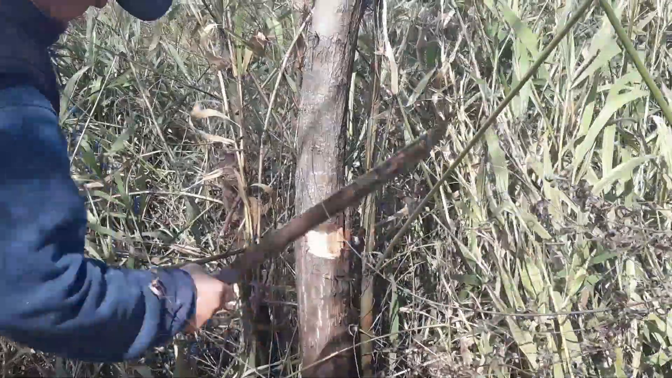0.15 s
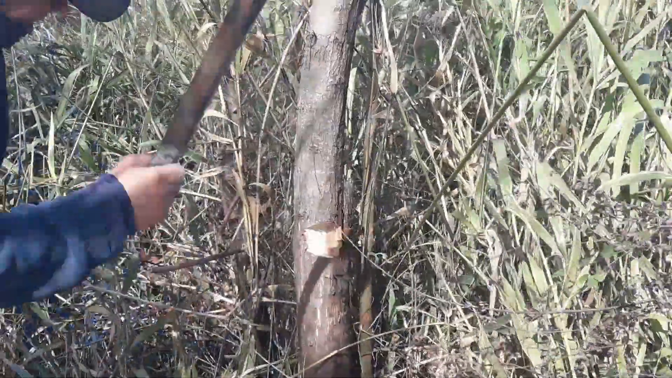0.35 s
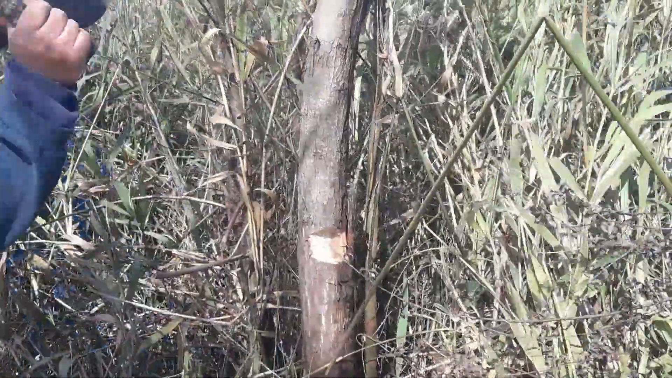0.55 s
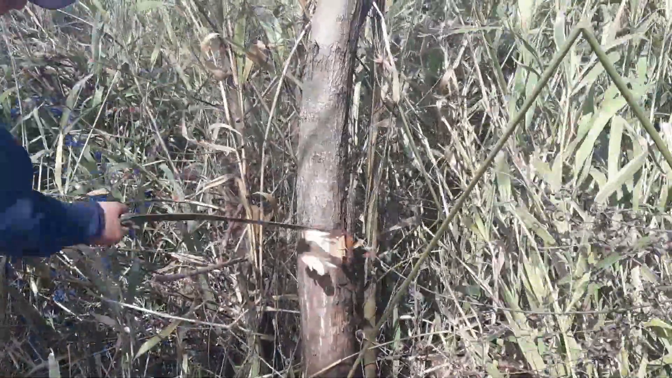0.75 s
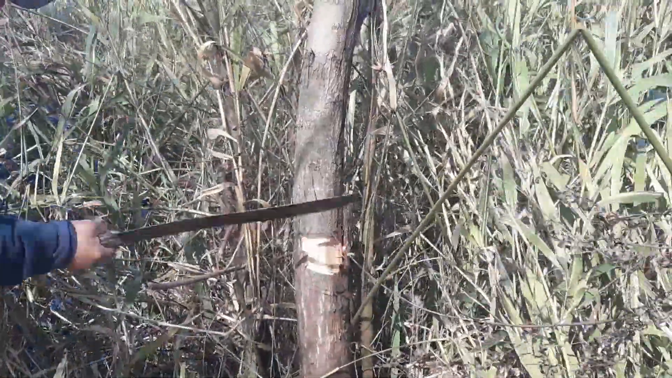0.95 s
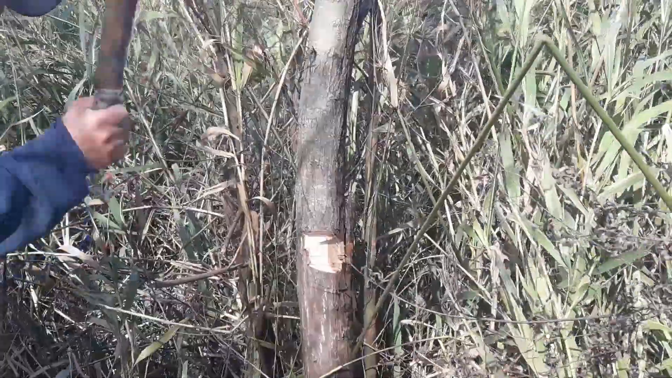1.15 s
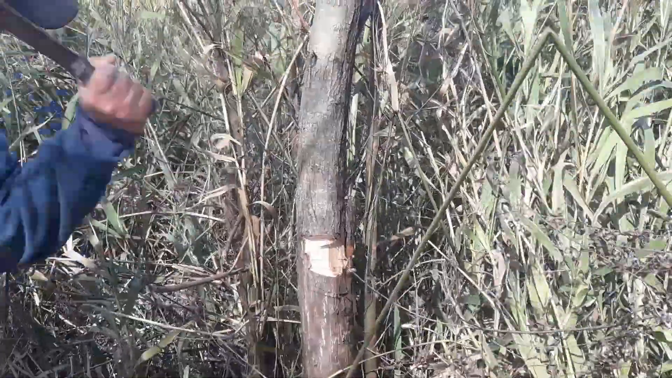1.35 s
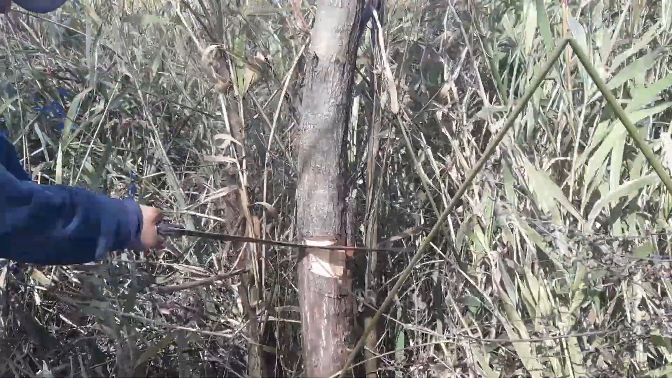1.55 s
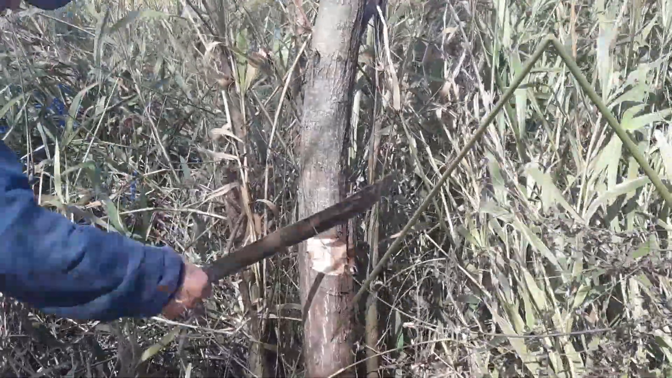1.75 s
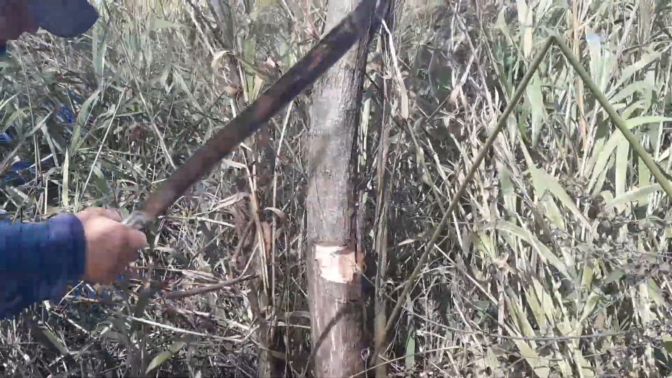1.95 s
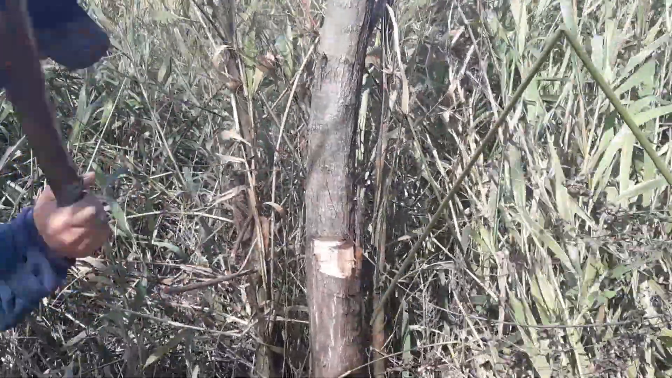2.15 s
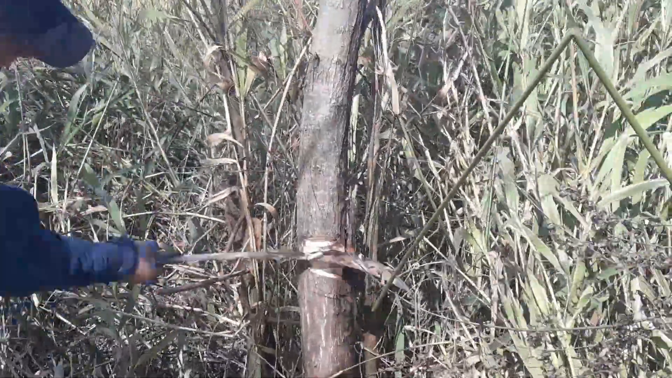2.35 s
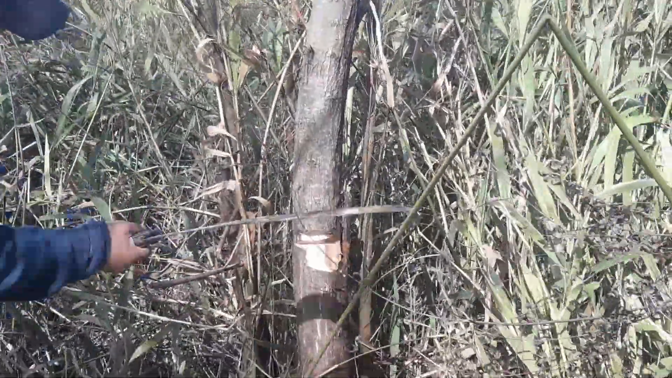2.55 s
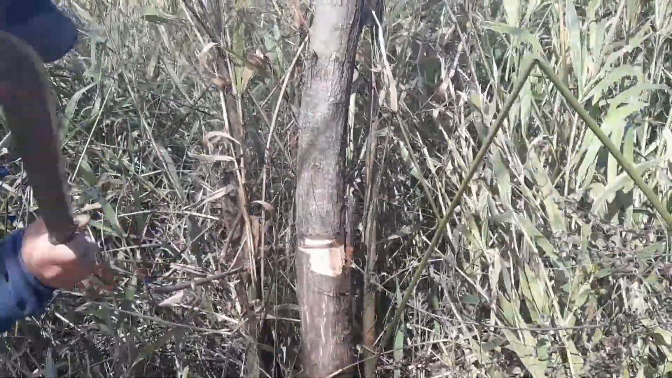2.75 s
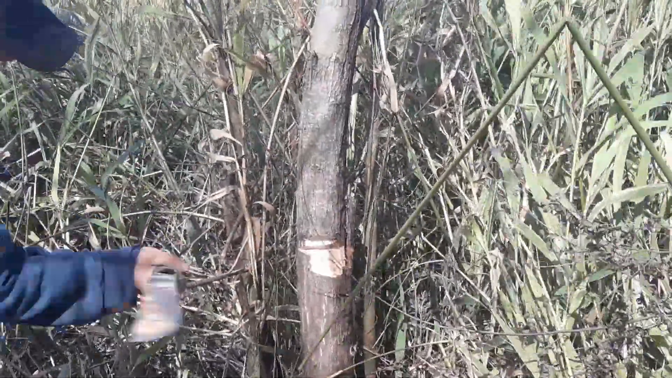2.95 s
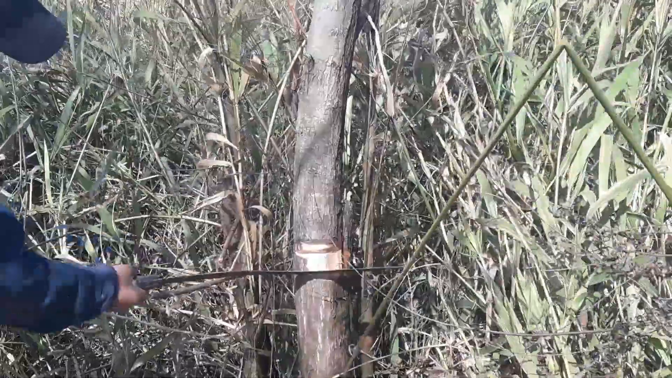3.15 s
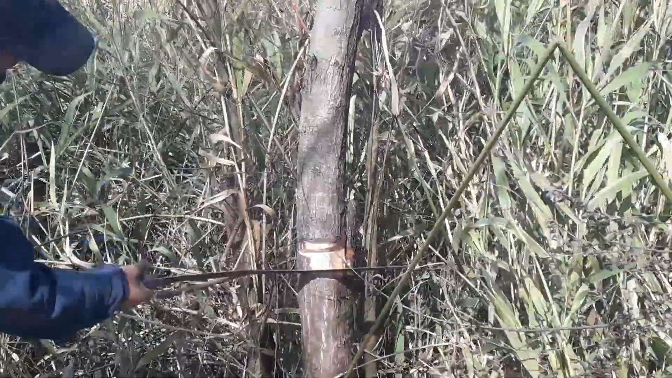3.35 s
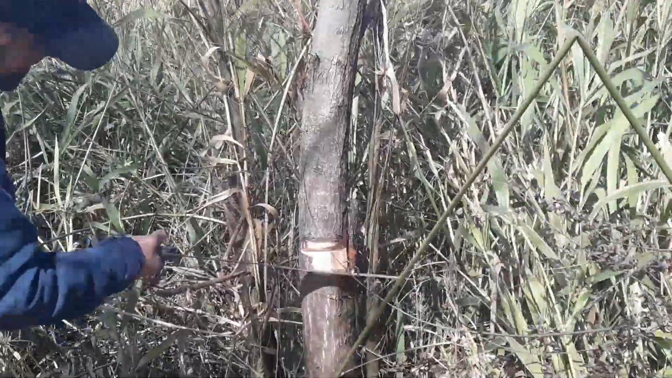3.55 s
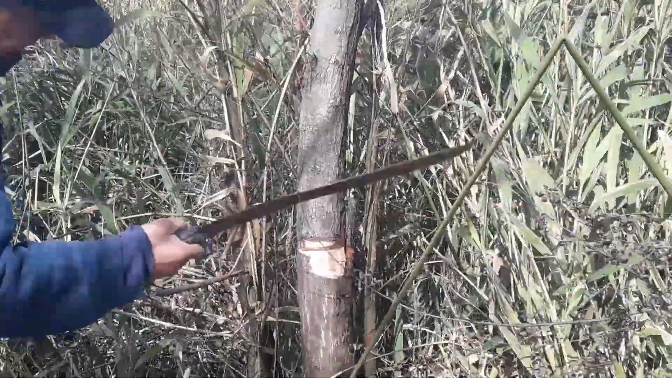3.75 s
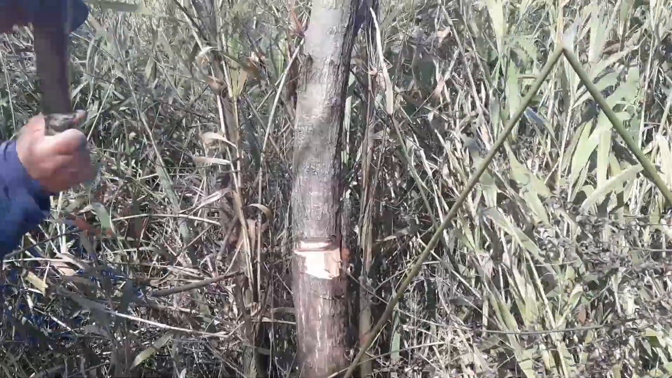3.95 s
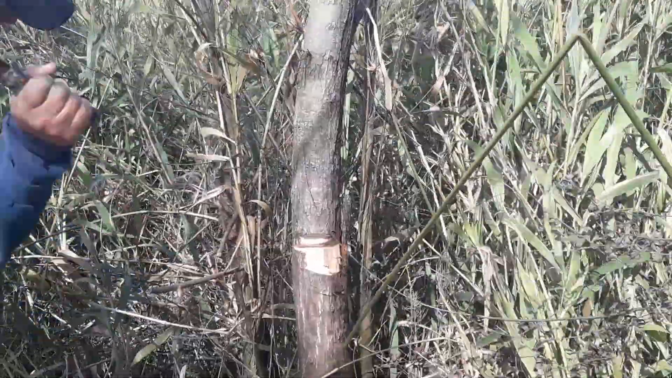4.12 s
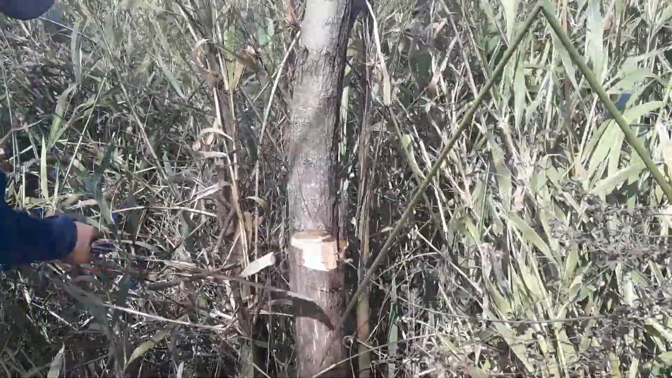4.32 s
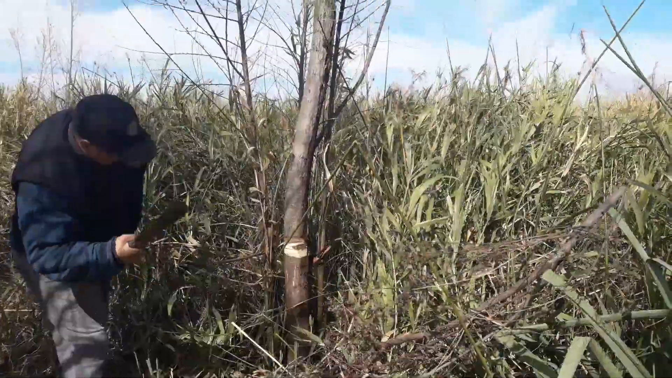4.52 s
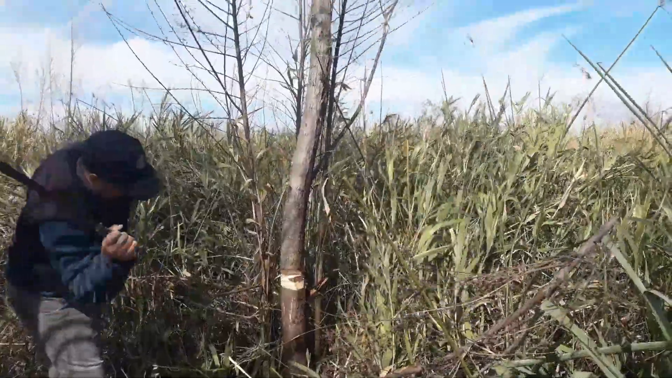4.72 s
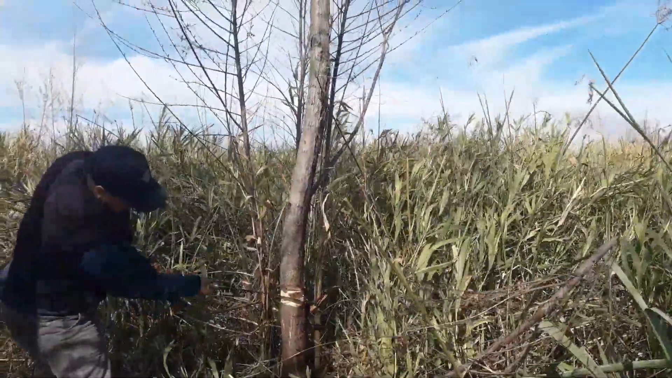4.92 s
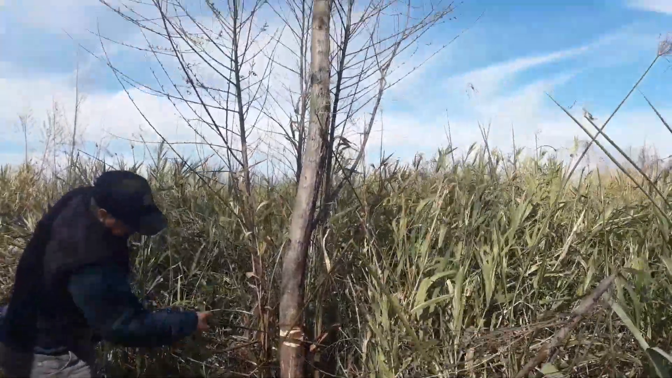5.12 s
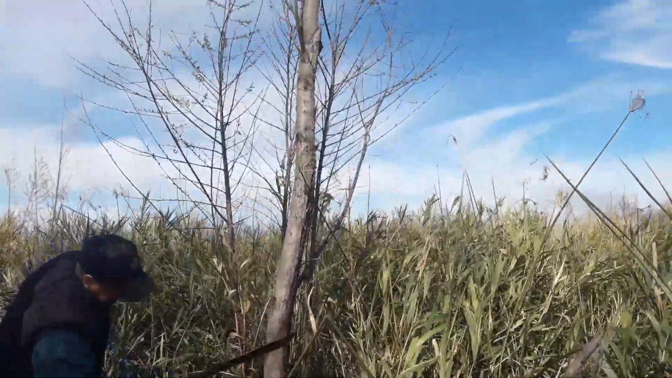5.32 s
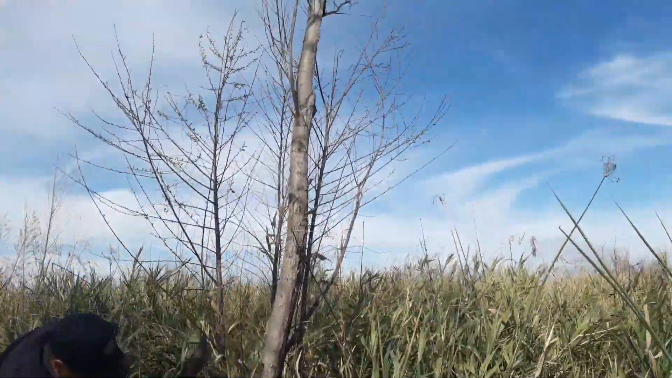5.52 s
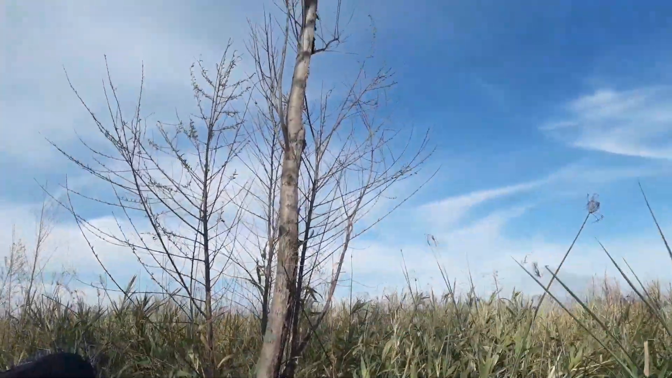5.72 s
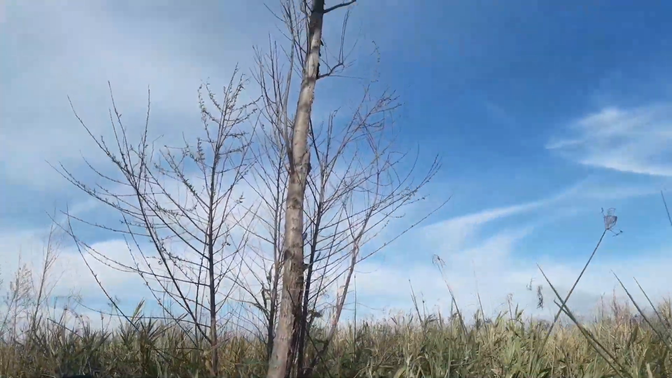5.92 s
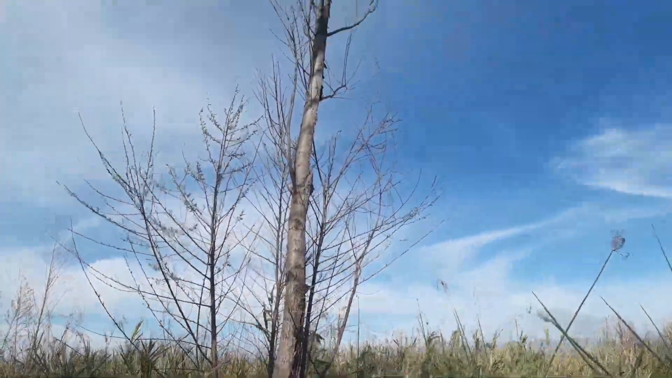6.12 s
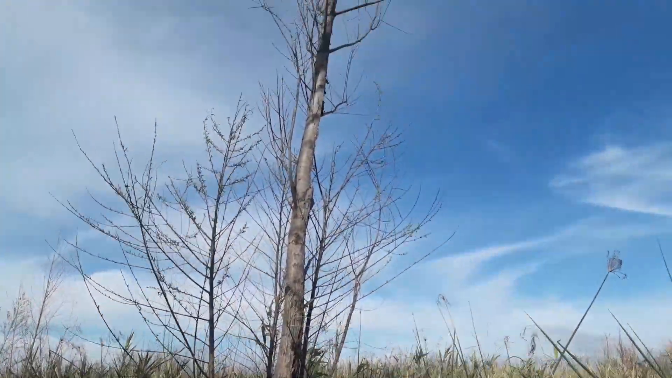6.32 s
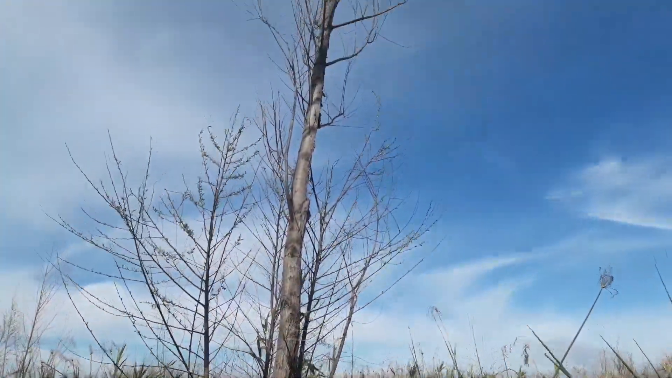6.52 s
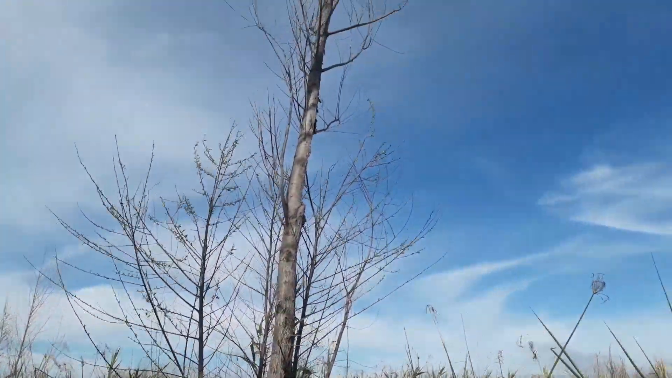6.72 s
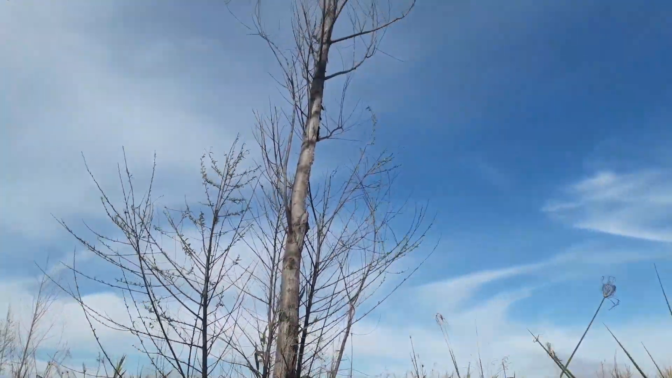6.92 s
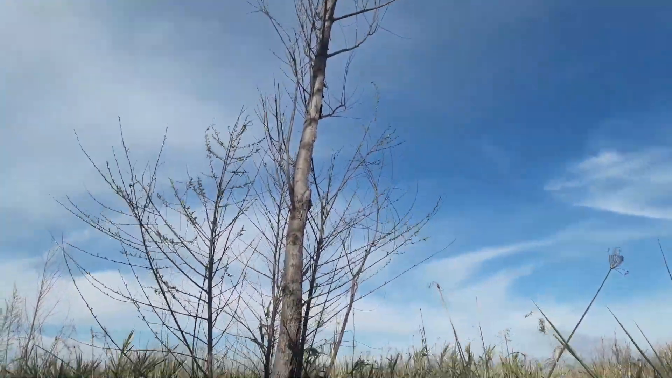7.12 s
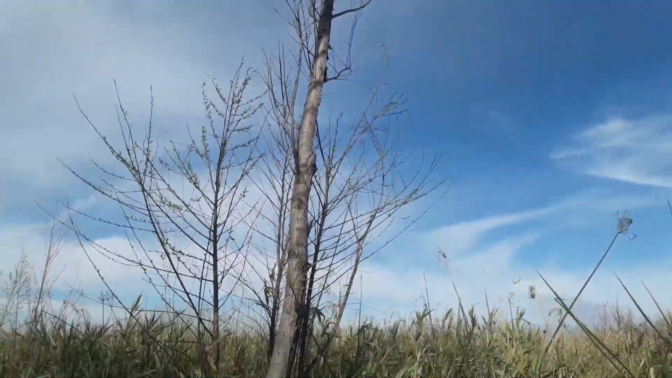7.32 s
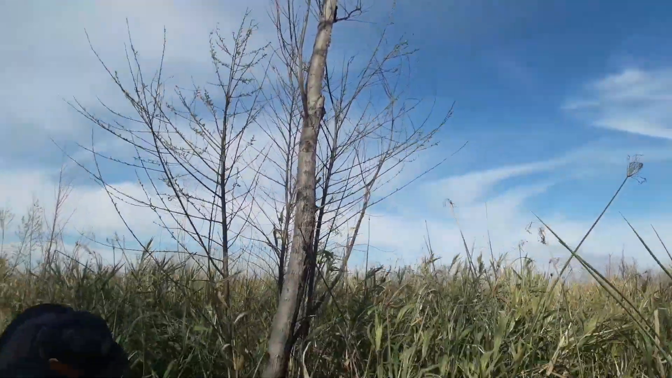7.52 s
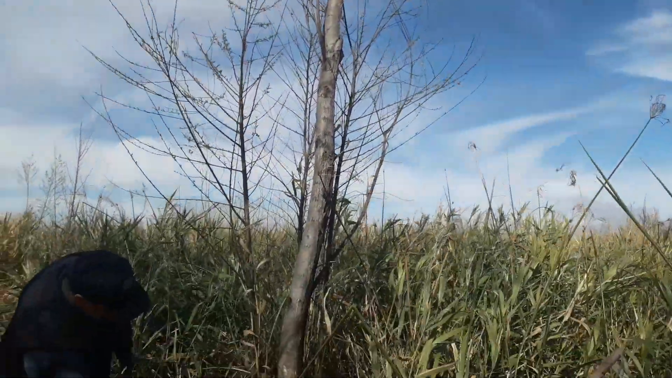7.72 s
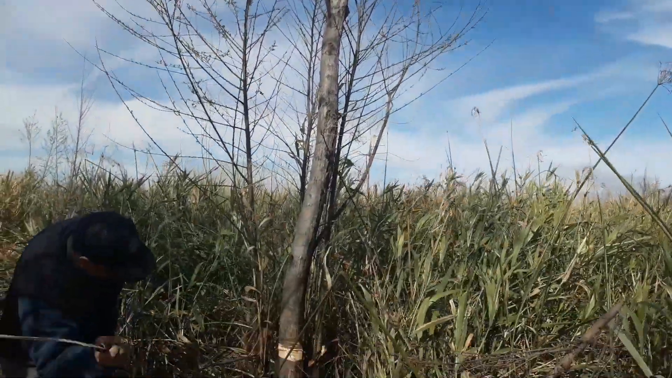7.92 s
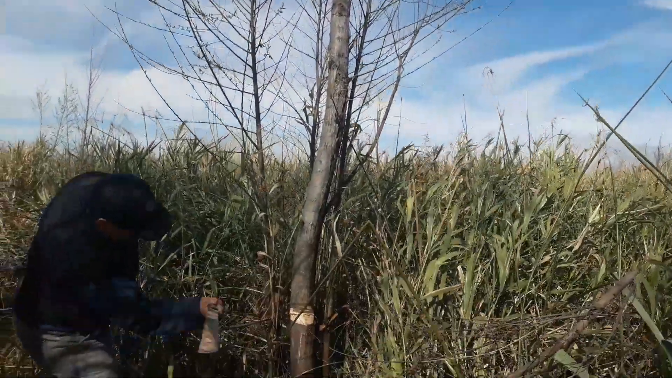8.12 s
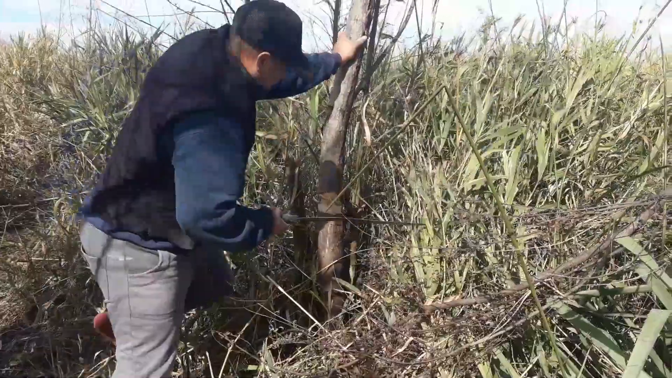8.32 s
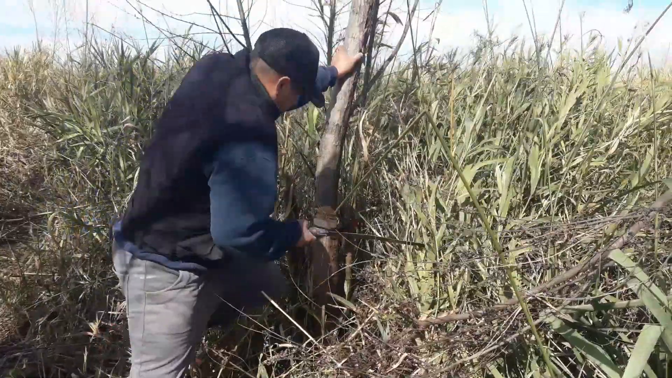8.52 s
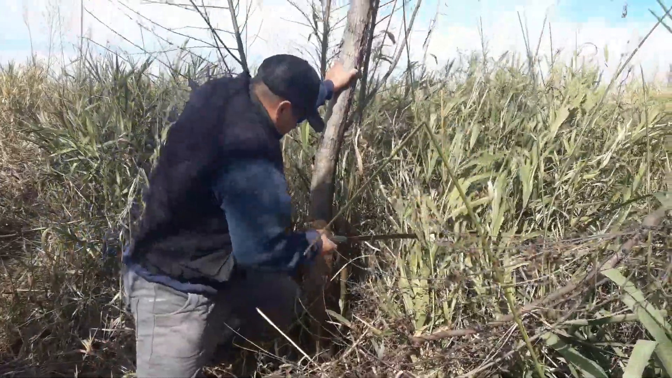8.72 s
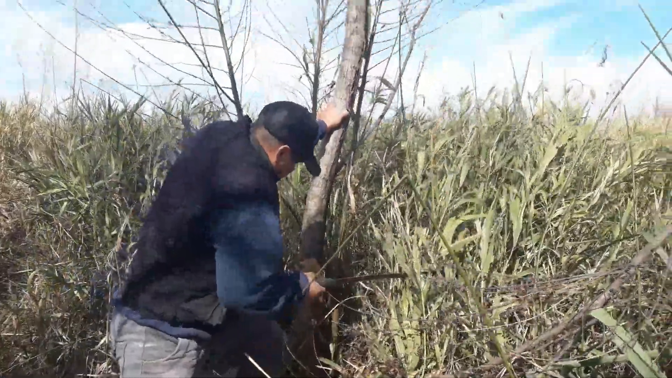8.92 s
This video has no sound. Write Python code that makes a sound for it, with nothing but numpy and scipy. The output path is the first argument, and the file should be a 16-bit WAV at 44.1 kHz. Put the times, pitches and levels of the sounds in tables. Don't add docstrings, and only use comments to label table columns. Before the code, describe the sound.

A small microphone sits close to a thin green trunk in a breezy reed bed. A faint snap and steel tick open over soft leaf hiss, followed by dry stem clicks. The first bright chop lands at 0.8 s: splitting crack, short wooden knock, brief blade ring and a scatter off the reeds. More stems snap around 1.1 s; a duller, solid blow comes at 1.5, snaps near 1.8, a strong crack at 2.4 and a bright one at 3.1. The loudest crack falls at 4.3 with small metallic pings after it, then a heavy dull blow at 5.0. From 5.65 wind slams the microphone with low thumps and puffs, rumbling unevenly until about 7.4. Through it come a faint chop at 6.2 and a very bright one at 6.9. Another bright, light-knocking chop follows at 7.6, a choked last blow at 8.3, and a sharp twig snap at 8.65 over rustling reeds until 9.

```python
import sys
import numpy as np
from scipy import signal
from scipy.io import wavfile
from scipy.ndimage import uniform_filter1d, minimum_filter1d

SR = 44100
rng = np.random.default_rng(int(sys.argv[2]) if len(sys.argv) > 2 else 0)


def store_wav(level_fs):
    pcm = np.round(np.clip(np.atleast_2d(level_fs), -1, 1) * 32767)
    wavfile.write(sys.argv[1], SR, pcm.T.astype(np.int16))


def ratio(d):
    e = np.asarray(d, float) / 20
    return 10 ** e


N = 399973
EVENT = 2 * SR // 5


def rms_one(x):
    return x / np.sqrt(np.mean(x ** 2) + 1e-20)


def butter(x, order, hz, kind):
    return signal.sosfilt(signal.butter(order, hz, kind, fs=SR, output="sos"), x)


def in_time(rows):
    s, *columns = np.transpose(rows)
    return [np.interp(np.arange(N) / SR, s, column) for column in columns]


def drift(rate):
    r = np.exp(-80 * np.pi * rate / SR)
    white = rng.standard_normal(N // 40 + 2002)
    slow = signal.lfilter([1], [1, -2 * r, r * r], white)[2000:]
    return np.interp(np.arange(N) / 40, np.arange(len(slow)), rms_one(slow))


def ring(clicks, hz, t60):
    r, w = ratio(-60 / (t60 * SR)), 2 * np.pi * hz / SR
    return signal.lfilter([0, np.sin(w)], [1, -2 * r * np.cos(w), r * r], clicks + 1e-18)


def resonance(x, hz, width_hz):
    r = np.exp(-np.pi * width_hz / SR)
    poles = [1, -2 * r * np.cos(2 * np.pi * hz / SR), r * r]
    return signal.lfilter((1 - r * r) / 2 * np.array([1, 0, -1]), poles, x)


# (frequency [Hz], width [Hz], level [dB])
HOUSING_MODES = [(3030, 790, -1), (5440, 350, 3.5)]


def housing(x):
    return rms_one(sum(ratio(level_db) * resonance(x, hz, width_hz) for hz, width_hz, level_db in HOUSING_MODES))


def bands(spectrum):
    hz, level_db = np.transpose(spectrum)
    edges = np.geomspace(hz[0], hz[-1], int(3 * np.log2(hz[-1] / hz[0])) + 2)
    white, out = rng.standard_normal((2, N)), []
    for k, (low, high) in enumerate(zip(edges, edges[1:])):
        mid = np.sqrt(low * high)
        band = butter(white[k % 2], 2, [low, high], "band")
        out.append((mid, band * ratio(np.interp(np.log(mid), np.log(hz), level_db))))
    total = np.sqrt(sum(np.mean(band ** 2) for mid, band in out))
    return [(mid, band / total) for mid, band in out]


def fall(level_db, t60, rise, delay=0.):
    t = np.maximum(np.arange(EVENT) / SR - delay, 0)
    return ratio(level_db - 60 * t / t60) * (1 - np.exp(-t / rise))


def add(out, s, piece):
    at = round(s * SR)
    out[at:at + len(piece)] += piece[:N - at]


def piece_of(noise, s):
    return noise.take(round(s * SR) + np.arange(EVENT), mode="wrap")


# (time [s], rustle level [dB], nearness of the moving leaves [dB])
REED_MOTION = [(0.0, -50.5, 2), (0.45, -49, 6.5), (0.73, -38.5, 6.5), (0.93, -41.5, 0), (1.08, -43.5, 11),
               (1.26, -48, -2), (1.64, -45, 0.5), (2.33, -40.5, -4), (2.8, -53, -1), (3.6, -50, -1),
               (4.24, -42.5, -1.5), (4.7, -45.5, -0.5), (5.35, -60, 0), (5.88, -42, 1), (6.62, -58, 1),
               (7.35, -60, 1.5), (7.75, -49.5, -2), (9.07, -41.5, 2.5)]


def stirring():
    rustle_db, near_db = in_time(REED_MOTION)
    t = np.arange(N) / SR
    before_s, after_s = 0.1, 0.19
    stirred = sum(np.exp(np.minimum((t - s) / before_s, (s - t) / after_s)) for s, *_ in CHOPS)
    rustle_db = rustle_db + 5.5 * stirred
    swing_db = rustle_db - np.mean(rustle_db)
    swish_db = -53 + 0.63 * swing_db + near_db
    sizzle_db = -68 + 0.47 * swing_db + 1.36 * near_db
    return rustle_db, swish_db, sizzle_db


# (frequency [Hz], level per Hz [dB])
RUSTLE_SPECTRUM = [(180, -5), (300, 0), (413, -3), (465, -1), (539, -8.5), (591, -5), (792, -3),
                   (1150, -3.5), (1400, -6.5), (1520, -4.5), (3200, -4.5), (5370, -11), (7200, -17.5),
                   (9360, -59), (15800, -120)]
# (frequency [Hz], level per Hz [dB])
SIZZLE_SPECTRUM = [(4410, -34), (7500, -19), (8160, -33), (9220, 10), (14900, 13), (15600, -3), (16200, -9)]


def reeds(rustle_db, swish_db, sizzle_db):
    shared, out = drift(25), 0
    rustle_mean_db, swish_mean_db = np.mean(rustle_db), np.mean(swish_db)
    for hz, band in bands(RUSTLE_SPECTRUM):
        follow = np.clip(0.43 + 0.063 * np.log2(hz / 300), 0, 1)
        bright = np.clip(7.5 * np.log2(hz / 2800), 0, 1)
        swing_db = (1 - bright) * follow * (rustle_db - rustle_mean_db) + bright * (swish_db - swish_mean_db)
        out = out + band * ratio(rustle_mean_db + 4.0 + swing_db + 0.83 * shared + 1.0 * drift(14))
    for hz, band in bands(SIZZLE_SPECTRUM):
        out = out + band * ratio(sizzle_db + 2.0 + 0.7 * shared + 0.65 * drift(8))
    return out


def brushing(swish_db):
    landed = rng.random(N) < 2500 / SR
    strength = ratio(3.7 * np.minimum(rng.exponential(1, N), 4.0))
    grains = landed * strength * rng.choice([-1, 1], N)
    return housing(grains + 1e-18) * ratio(-43.5 + 1.48 * (swish_db + 43.5) + 2.8 * drift(30))


# (time [s], level [dB])
BREEZE_LEVEL = [(0.0, -48), (0.2, -56), (0.7, -46.5), (1.15, -49.5), (2.2, -46.5), (2.8, -51), (3.6, -50),
                (4.2, -40.5), (4.65, -53.5), (4.95, -41.5), (5.2, -61), (5.5, -54), (6.5, -36.5),
                (7.4, -43), (7.62, -57), (7.95, -49), (9.07, -49)]
# (time [s], peak level [dB], hold [s])
GUST_PEAKS = [(0.834, -37, 0.051), (2.354, -34, 0.046), (2.495, -39.5, 0.052), (5.564, -39.5, .012),
              (5.629, -28.5, 0.014), (5.688, -16.5, 0.03), (5.75, -19, 0.028), (5.791, -25.5, 0.043),
              (5.9, -32, 0.057), (5.95, -35, .07), (6.041, -19.5, 0.053), (6.117, -26, 0.078),
              (6.285, -31, 0.011), (6.368, -29.5, 0.055), (6.49, -33.5, .05), (6.544, -29.5, 0.062),
              (6.746, -26, .03), (6.789, -19.5, 0.12), (6.93, -25, 0.098), (7.035, -26, 0.12),
              (7.17, -27.5, .11), (7.325, -34, 0.051), (7.383, -33, 0.02), (7.927, -39, 0.029),
              (8.15, -39.5, 0.017), (3.65, -41.5, .04), (4.82, -44, .05), (6.594, -29, 0.021)]


def gusting():
    rise_db_per_s, fall_db_per_s = 550, 329
    t, (level_db,) = np.arange(N) / SR, in_time(BREEZE_LEVEL)
    for s, peak_db, hold in GUST_PEAKS:
        loss_db = np.maximum(rise_db_per_s * (s - t), fall_db_per_s * (t - s - hold))
        level_db = np.maximum(level_db, peak_db - np.maximum(loss_db, 0))
    return level_db


# (frequency [Hz], level per Hz [dB])
BUFFET_SPECTRUM = [(15, -61), (25, -18.5), (112, 1), (267, -1.5), (294, -3), (425, -3), (486, -7.5),
                   (601, -8.5), (1250, -24.5), (2500, -42), (3250, -72), (5500, -120)]


def wind():
    full_gust_db, dulling_per_octave = -13, 0.18
    level_db = gusting()
    lumps_db = 1.07 * drift(16.6) + 2.85 * drift(94)
    out = 0
    for hz, band in bands(BUFFET_SPECTRUM):
        swing = 1 + dulling_per_octave * max(np.log2(hz / 150), 0)
        below_db = swing * (level_db - full_gust_db + lumps_db)
        out = out + band * ratio(full_gust_db + 2.5 + below_db + 0.89 * drift(14.0))
    return out


PING_TIMES = (.027, .03, .028, .027, .028, .029, .82, .815, 2.48, 4.368, 4.345, 4.372, 4.492, 4.495, 4.418)
# (level [dB], frequency [Hz], decay time t60 [s])
PING_MODES = [(-37, 3880, 0.06), (-44, 5000, 0.059), (-36.5, 3360, 0.058), (-31, 2420, 0.031),
              (-34, 2030, 0.034), (-35, 2850, .03), (-58, 8700, .08), (-38.5, 3380, 0.16),
              (-51, 3880, 0.18), (-34, 3400, 0.098), (-52, 8740, .08), (-58, 8680, .15), (-59, 11250, 0.09),
              (-66, 12100, .08), (-62, 6950, .15)]


def pings():
    out, t = np.zeros(N), np.arange(EVENT) / SR
    for s, (level_db, hz, t60) in zip(PING_TIMES, PING_MODES):
        add(out, s, fall(level_db + 12.5, t60, 0.0052) * np.sin(2 * np.pi * hz * t))
    return out


# (frequency [Hz], level per Hz [dB])
CRACK_SPECTRUM = [(710, 1.5), (1200, -15.5), (1730, -12.5), (2640, 0.5), (2940, -3), (3280, -1.5),
                  (3820, -8), (5190, -7), (6890, -24), (7500, -52), (9750, -53), (16500, -120)]
# (frequency [Hz], level per Hz [dB])
EDGE_SPECTRUM = [(4410, 5.5), (7500, 10), (8130, -29), (8840, -5), (13100, -4.5), (15500, -15),
                 (16200, -15)]


def fracture_noises():
    return [sum(band for hz, band in bands(spectrum)) for spectrum in (CRACK_SPECTRUM, EDGE_SPECTRUM)]


# (time [s], peak level [dB], edge level [dB], decay time t60 [s])
STEM_SNAPS = [(0.028, -20.5, -61, 0.073), (0.473, -22.5, -44, 0.041), (0.5735, -28, -53, 0.034),
              (0.748, -20, -27, 0.023), (0.858, -19.5, -39, 0.043), (1.06, -26, -31, 0.064),
              (1.0956, -12.5, -31, 0.04), (1.1128, -21, -35, 0.084), (1.262, -27.5, -49, 0.04),
              (1.285, -29, -60, 0.035), (1.434, -27, -44, 0.033), (1.745, -24, -55, 0.022),
              (1.8035, -19, -40, 0.012), (1.8716, -13.5, -48, 0.012), (1.986, -28, -55, 0.025),
              (2.0726, -31, -50, 0.028), (3.491, -25, -36, 0.032), (3.6195, -26.5, -49, 0.041),
              (3.631, -29, -65, 0.048), (4.3594, -27, -51, 0.03), (4.411, -21, -55, 0.044),
              (.6408, -23, -55, .04), (1.0444, -27, -50, .03), (.505, -29, -55, .02), (.738, -25, -45, .02),
              (4.446, -28, -67, 0.03), (6.1886, -28, -37, 0.06), (6.305, -26, -38.5, 0.094),
              (3.5864, -38, -59, .03), (4.314, -36, -44, .07), (8.744, -18, -63, 0.081),
              (8.992, -29, -65, 0.027)]
# (time [s], peak level [dB], edge level [dB], decay time t60 [s])
TWIG_SNAPS = [(1.097, -17, -45, .03), (1.116, -22, -45, .03), (1.062, -24, -45, .03),
              (1.1672, -25, -56, .03), (1.8425, -18, -50, 0.084), (3.4191, -23.5, -59, 0.02),
              (5.2297, -36, -65, .03), (5.28, -40, -65, .03), (7.1302, -32, -39.5, 0.077),
              (8.656, -6, -46, 0.03), (8.689, -19, -48, 0.02), (5.75, -30, -39, .015)]


def snaps(crack, edge):
    stem_hz, twig_hz = 3260, 5240
    out = np.zeros(N)
    body = rms_one(butter(rng.standard_normal(N), 2, [500, 1500], "band"))
    events = [(*row, stem_hz) for row in STEM_SNAPS] + [(*row, twig_hz) for row in TWIG_SNAPS]
    for s, peak_db, edge_db, t60, hz in events:
        body_db = -12 + 1.28 * peak_db
        t60 = np.clip(t60, .005, .2)
        tuned = 0.56 * housing(rng.standard_normal(EVENT))
        tuned += 1.11 * rms_one(resonance(piece_of(crack, s), hz, 2200))
        snap = tuned * (fall(peak_db - 4, 0.0068, 0.00046) + fall(peak_db - 13.5, t60, 0.00054))
        snap += piece_of(edge, s) * fall(edge_db, t60, 0.00016)
        snap += piece_of(body, s) * fall(body_db - .5, t60, .001)
        add(out, s, snap)
    return out


# (frequency [Hz], level [dB], decay time t60 [s])
BLADE_MODES = [(3360, -19, 0.015), (3760, -24, 0.013), (5500, -15, 0.0039), (6040, -15, 0.0093),
               (8800, -26.5, 0.042), (10600, -29, 0.0086), (13600, -26, .01)]
# (level [dB], frequency [Hz])
BLADE_GRIPS = [(-14, 2070), (-14, 2300), (-18, 2200), (-16, 2200), (-14, 2500), (-6, 2510), (-11, 2271),
               (-11, 2430), (-12, 2300), (-9, 2130)]


def blade(bite, number, crack_db, crack_hz, ring_db, clang_db, clang_hz):
    out = ratio(crack_db - 9 + ring_db) * ring(bite, crack_hz, 0.019)
    out -= ratio(clang_db + 4.0) * ring(bite, clang_hz, 0.0076)
    grip_db, grip_hz = BLADE_GRIPS[number]
    out += ratio(grip_db) * ring(bite, grip_hz, 0.025)
    for hz, mode_db, t60 in BLADE_MODES:
        chance_db, detune = rng.normal(0, [2, .02])
        out += ratio(crack_db + mode_db + chance_db) * ring(bite, hz * (1 + detune), t60)
    return out


# (frequency [Hz], level [dB], decay time t60 [s])
WALL_MODES = [(1152, -6, 0.029), (1524, -1.5, 0.03), (2000, -4, 0.022)]


def notch_wall(bite, split, wall_db, tail):
    drive = bite + 0.13 * split * fall(-11, tail * .7, 0.0022)
    return sum(ratio(wall_db + mode_db) * ring(drive, hz, t60) for hz, mode_db, t60 in WALL_MODES)


# (multiple of knock frequency [1], level [dB], decay time t60 [s])
LOW_MODES = [(.55, -8, 0.03), (.85, -4.5, 0.036), (1.0, 4.5, 0.036), (1.25, 1, 0.026), (1.65, -15, 0.02)]
# (multiple of upper knock frequency [1], level [dB], decay time t60 [s])
HIGH_MODES = [(.88, -4, 0.018), (1.0, 3, 0.028), (1.15, -11, 0.022)]
# (time [s], upper knock [Hz], upper over lower knock [dB])
NOTCH_DEPTH = [(0.8, 837, 0), (1.54, 860, 1), (2.45, 872, 2.5), (3.1, 936, 2), (4.34, 893, -3.5),
               (4.97, 893, 5.5), (6.2, 824, 7), (7.58, 800, 2.5), (8.26, 790, 4)]


def trunk(s, knock_db, shake_db, damping, tail):
    times, hz, over_db = np.transpose(NOTCH_DEPTH)
    high_hz, high_db = np.interp(s, times, hz), knock_db + np.interp(s, times, over_db)
    low = LOW_MODES, 334, knock_db + .4, 0
    high = HIGH_MODES, high_hz, high_db + .4, .0006
    out = np.zeros(EVENT)
    for modes, base_hz, level_db, delay in (low, high):
        for k, (multiple, mode_db, t60) in enumerate(modes):
            shake = fall(level_db + mode_db - 36.5 + shake_db, tail * 1.08, 0.0005, delay=0.0088)
            push = rng.standard_normal(EVENT) * shake
            push[round(delay * SR)] += ratio(level_db + mode_db + 1.0) * (-1) ** k
            out += ring(push, base_hz * multiple, t60 / damping)
    return out


# (time [s], crack level [dB], knock level [dB], brightness [dB], crack frequency [Hz])
CHOPS = [
    (0.8029, -5, -10, 1.5, 3150),
    (1.537, -9, -7.5, 0, 2820),
    (2.446, -2.5, -9.5, 0, 2770),
    (3.0989, -4.5, -10, 1, 3260),
    (4.337, 3, -6, 0.5, 3024),
    (4.9748, 0, -8, -2, 2710),
    (6.2145, -10, -11, 1, 2880),
    (6.9222, -2, -13, 6.5, 2900),
    (7.5816, -1, -14, 5, 2650),
    (8.2624, -6, -7, 0, 2580),
]
# (crack ring [dB], reed scatter [dB], wood after-shake [dB],
# notch wall [dB], knock damping factor [1])
SEATING = [(2.5, 2.5, -1.5, -25, 0.97), (0, 0.5, 0, -25, 0.95), (0, 0, 1.5, -25, 1.14),
           (0, 1.5, 2.5, -24, 0.97), (6, -0.5, -0.5, -26, 1.07), (4.5, 2, 3, -23, 1.12),
           (2.5, 2, 0.5, -17, 1.16), (0, -2.5, 1.5, -24, 0.98), (3, -6, 1, -27, 1.07),
           (1, 7, 2, -15.5, 0.94)]
# (blow number [1], level [dB], frequency [Hz])
CLANGS = [(0, -7.5, 5100), (1, -14, 4050), (2, -3, 4200), (3, -22, 4730), (4, -7, 4460), (5, -5.5, 3250),
          (6, -11, 3250), (7, -8.5, 4770), (8, -12, 3300), (9, -12, 3300)]


def chops(crack, edge):
    out, splinters = np.zeros(N), ratio(2.0 * drift(120))
    clangs = {round(k): (hz, level_db) for k, level_db, hz in CLANGS}
    tail, drop_s = 0.13, 8.293
    for number, (s, crack_db, knock_db, bright_db, crack_hz) in enumerate(CHOPS):
        ring_db, reed_db, shake_db, wall_db, damping = SEATING[number]
        clang_hz, clang_db = clangs.get(number, (3800, -35))
        edge_db = crack_db + bright_db - 21
        scatter_db = 1.9 + 0.73 * crack_db + reed_db
        split, top, tear = (piece_of(noise, s) for noise in (crack, edge, splinters))
        bite = np.zeros(EVENT)
        bite[[8, 8 + round(SR / crack_hz * 2), 8 + round(SR / crack_hz * 5)]] = 1, .6, .45
        blow = blade(bite, number, crack_db, crack_hz, ring_db, clang_db, clang_hz)
        blow += notch_wall(bite, split, wall_db, tail)
        blow += split * fall(crack_db - 10.5, 0.032, 0.0005)
        scatter = 1.01 * split
        scatter += 0.13 * rms_one(resonance(split, crack_hz, 300))
        scatter += 0.17 * rms_one(resonance(split, clang_hz, 350))
        blow += scatter * tear * fall(scatter_db - 18, tail, 0.0013)
        blow += top * fall(edge_db + 4.5, 0.021, 0.00015)
        blow += top * tear * fall(edge_db - 6.5 + reed_db, tail * 1.3, 0.003)
        blow += trunk(s, knock_db, shake_db, damping, tail)
        add(out, s, blow)
    out[round(drop_s * SR):] *= ratio(-19)
    return butter(out, 2, 110, "high")


# (time [s], peak level [dB], frequency [Hz])
EDDY_BURSTS = [(1.989, -39, 218), (2.332, -19, 92), (2.362, -16, 104), (2.607, -21, 154),
               (3.666, -23.5, 100), (3.684, -27.5, 120), (4.414, -18, 264), (5.631, -19, 102),
               (5.666, 2.5, 157), (5.693, -3, 300), (5.74, 2.5, 435), (5.753, -6, 172), (5.765, -8, 210),
               (5.843, -5.5, 164), (5.892, -11, 219), (6.032, -6, 207), (6.175, -8, 222), (6.396, -1, 382),
               (6.545, -19, 157), (6.604, -11, 230), (6.808, -7.5, 220), (6.884, -4, 184),
               (7.003, -11, 207), (7.108, -20, 210), (7.219, -12, 113), (7.253, -8, 282),
               (7.387, -14.5, 197), (7.938, -21.5, 150), (7.96, -23, 181), (8.165, -21.5, 138),
               (8.031, -29, 150), (8.638, -27.5, 110), (8.685, -31, 120), (6.76, -15, 200),
               (6.825, -8, 230), (6.847, -11, 200), (6.906, -14, 250), (7.121, -10, 250), (7.229, -14, 230),
               (5.708, -9, 300), (5.72, -9, 260)]


def eddies():
    half = SR // 30
    out, t = np.zeros(N), np.arange(-half, half) / SR
    phases = rng.uniform(0, 2 * np.pi, len(EDDY_BURSTS))
    for (s, peak_db, hz), phase in zip(EDDY_BURSTS, phases):
        at = round((s + 0.0034) * SR) - half
        envelope = ratio(peak_db - 3.5) * np.exp(-np.abs(t * hz * 1.76) ** 1.36)
        out[at:at + len(t)] += envelope * np.sin(2 * np.pi * hz * t + phase)
    return out


# (time [s], peak level [dB], decay time t60 [s])
EDDY_FRONTS = [(5.666, -11.5, 0.042), (5.692, -20, 0.044), (5.713, -21, 0.04), (5.741, -14, 0.04),
               (5.752, -8.5, 0.037), (5.765, -24, 0.032), (5.795, -28, 0.04), (6.046, -18.5, 0.04),
               (6.075, -23, 0.04), (6.085, -16, 0.043), (6.139, -36, 0.04), (6.357, -31, 0.04),
               (6.398, -24, 0.037), (6.516, -38, 0.04), (6.551, -22, 0.034), (6.567, -21, 0.04),
               (6.603, -34, 0.04), (6.746, -35, 0.035), (6.765, -26, 0.04), (6.774, -22, 0.04),
               (6.794, -20, 0.044), (6.805, -19, 0.04), (6.827, -25, 0.037), (6.844, -26, 0.04),
               (6.88, -20, 0.04), (6.897, -15, 0.04), (7.005, -19, 0.052), (7.043, -24, 0.04),
               (7.084, -24, 0.04), (7.094, -24, 0.04), (7.117, -21, 0.04), (7.153, -26, 0.04),
               (7.198, -26, 0.034), (7.226, -29, 0.04), (7.252, -22, 0.045), (7.273, -35, 0.04),
               (7.392, -29, 0.045)]


def slaps():
    out = np.zeros(N)
    puff = butter(rng.standard_normal(N), 1, [350, 700], "band")
    puff = rms_one(butter(puff, 1, 1300, "low"))
    for s, peak_db, t60 in EDDY_FRONTS:
        add(out, s - .0012, piece_of(puff, s) * fall(peak_db - 3.0, np.clip(t60, .01, .3), 0.00055))
    return out


def scene():
    crack, edge = fracture_noises()
    leaves_db = stirring()
    foliage = reeds(*leaves_db) + brushing(leaves_db[1]) + snaps(crack, edge)
    blows = chops(crack, edge) + pings()
    gusts = wind() + eddies() + slaps()
    return (foliage + blows + gusts)[None]


def top_cut(x):
    return signal.sosfilt(signal.butter(12, 16870, fs=SR, output="sos"), x)


def record(dry):
    dip_hz, dip_width_hz, dip_share = 7680, 4650, 0.81
    x = dry - dip_share * resonance(dry, dip_hz, dip_width_hz)
    room_db = np.minimum(0, 20 * np.log10(1.25 / (np.abs(x) + 1e-9)))
    duck_db = uniform_filter1d(minimum_filter1d(room_db, size=500), size=200)
    x = np.clip(x * ratio(.8 * duck_db), -.89, .89)
    x = butter(x, 2, 38, "high")
    x = signal.sosfilt(signal.cheby2(12, 60, 16750, fs=SR, output="sos"), x)
    return top_cut(x)


dry = scene()
out = record(dry)
store_wav(out)
```